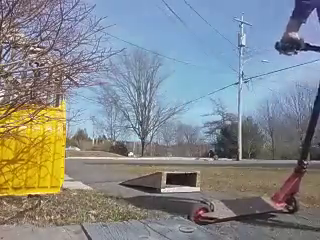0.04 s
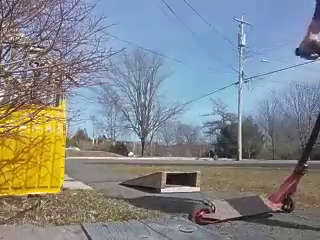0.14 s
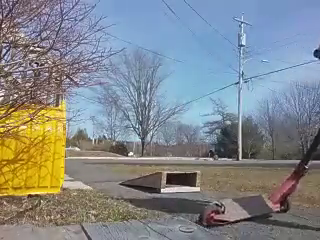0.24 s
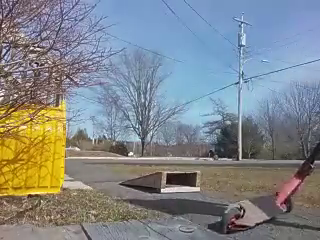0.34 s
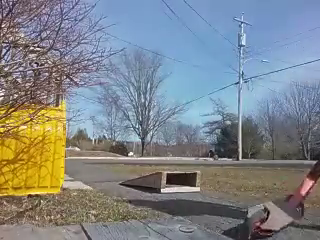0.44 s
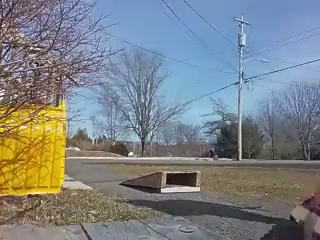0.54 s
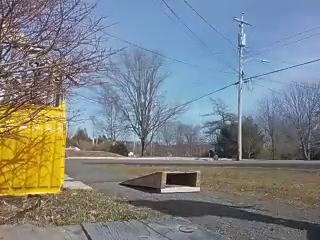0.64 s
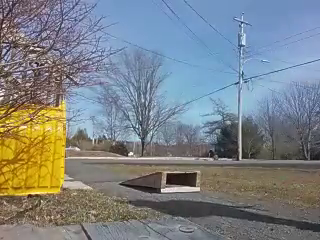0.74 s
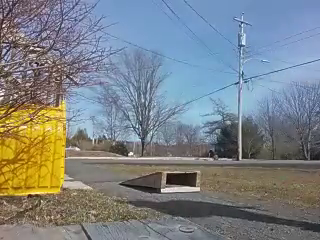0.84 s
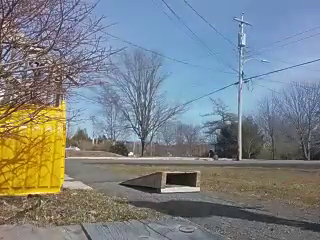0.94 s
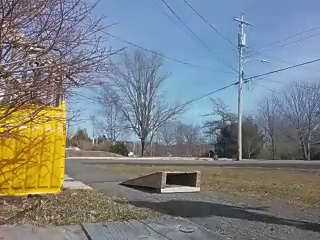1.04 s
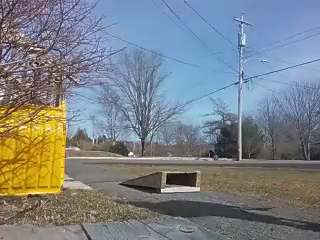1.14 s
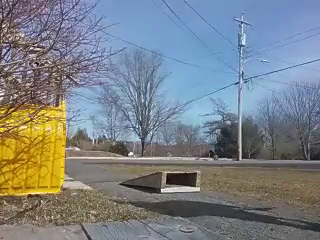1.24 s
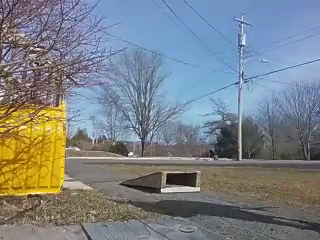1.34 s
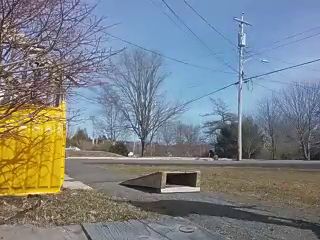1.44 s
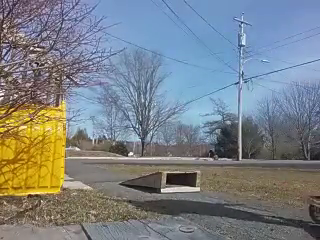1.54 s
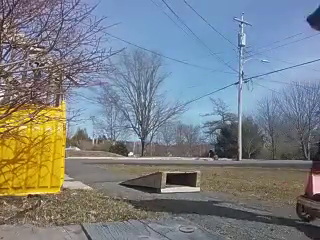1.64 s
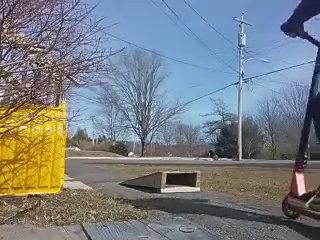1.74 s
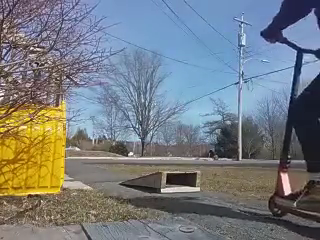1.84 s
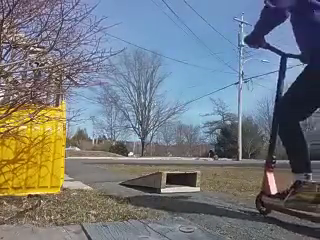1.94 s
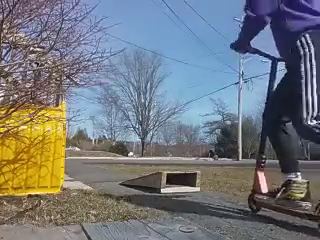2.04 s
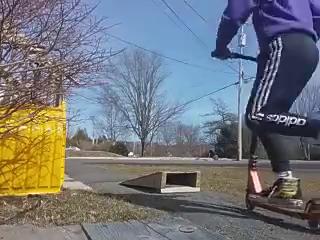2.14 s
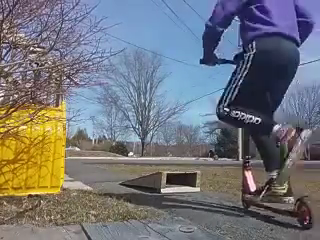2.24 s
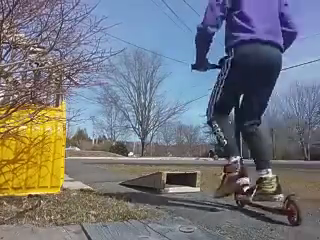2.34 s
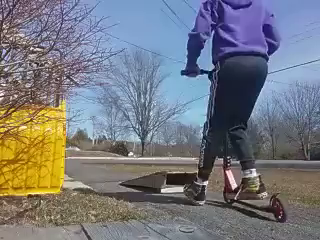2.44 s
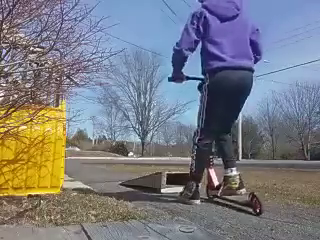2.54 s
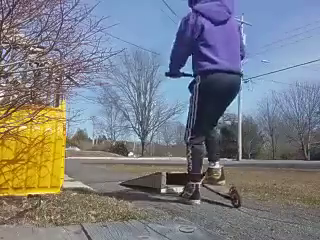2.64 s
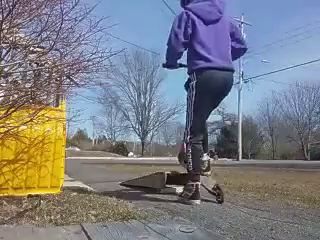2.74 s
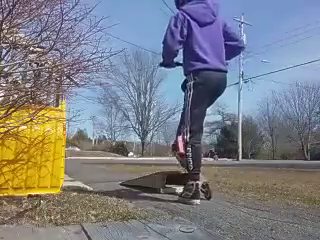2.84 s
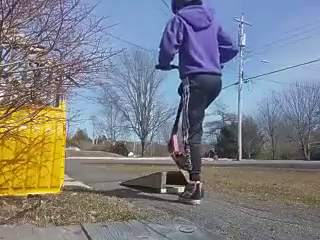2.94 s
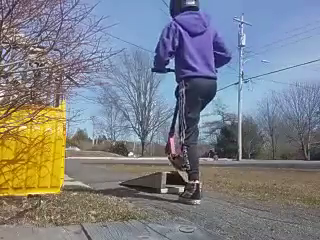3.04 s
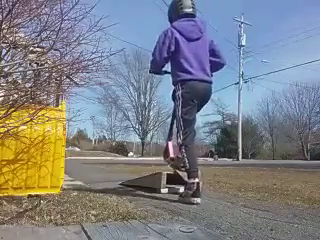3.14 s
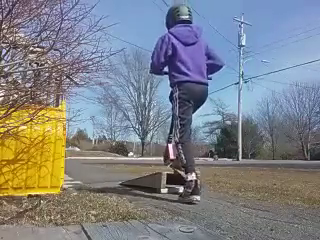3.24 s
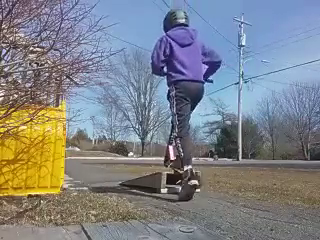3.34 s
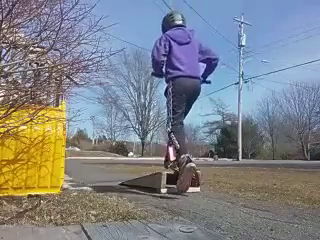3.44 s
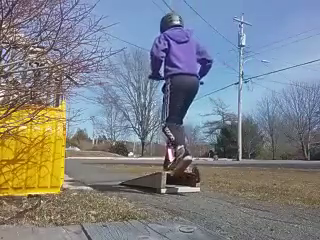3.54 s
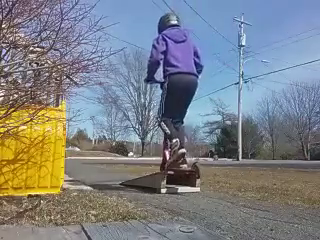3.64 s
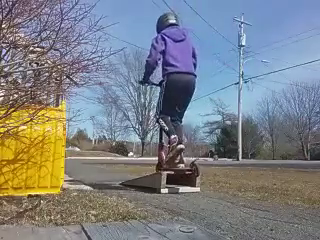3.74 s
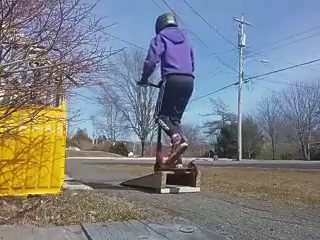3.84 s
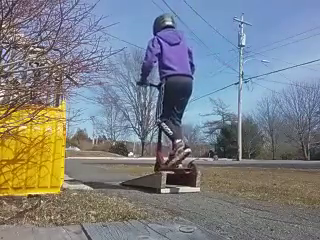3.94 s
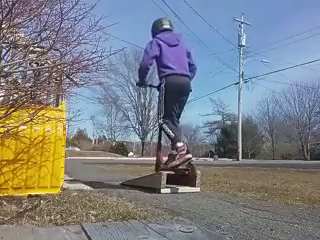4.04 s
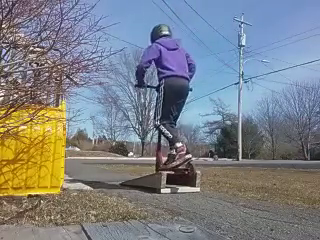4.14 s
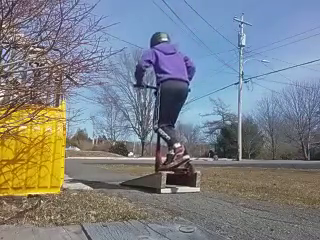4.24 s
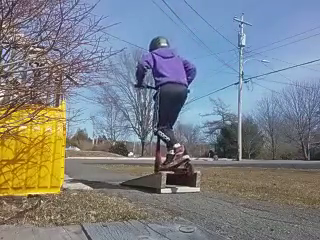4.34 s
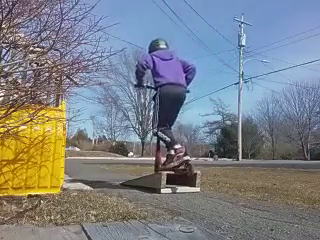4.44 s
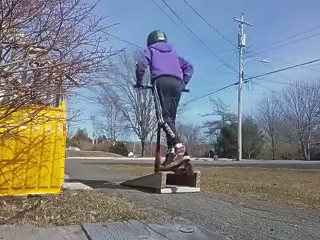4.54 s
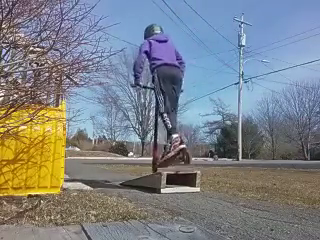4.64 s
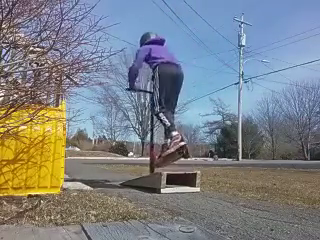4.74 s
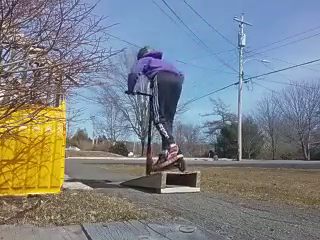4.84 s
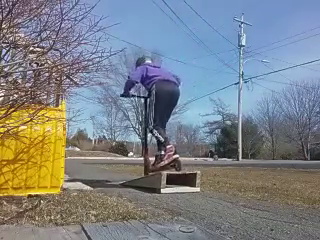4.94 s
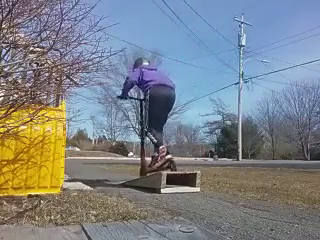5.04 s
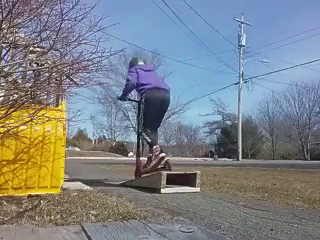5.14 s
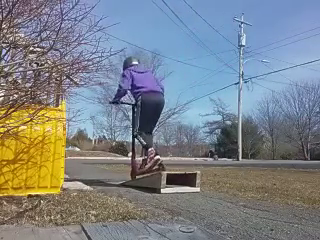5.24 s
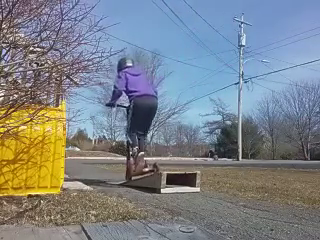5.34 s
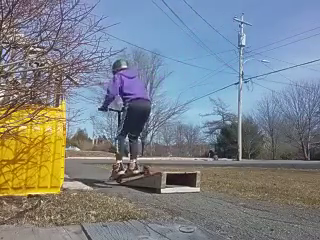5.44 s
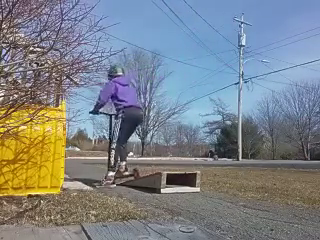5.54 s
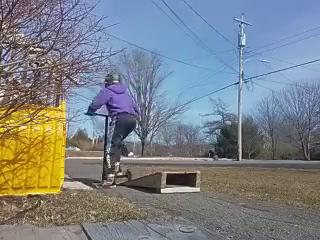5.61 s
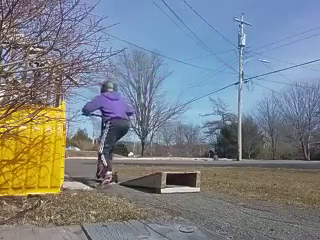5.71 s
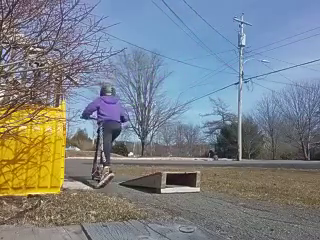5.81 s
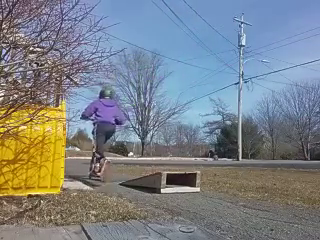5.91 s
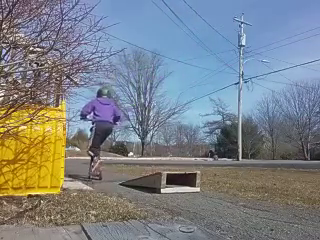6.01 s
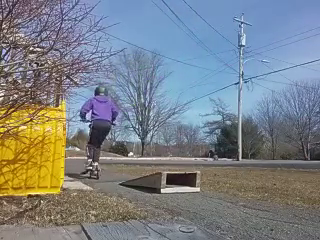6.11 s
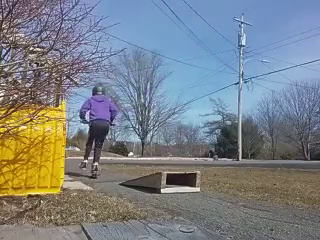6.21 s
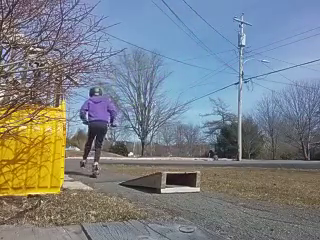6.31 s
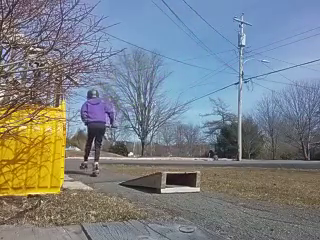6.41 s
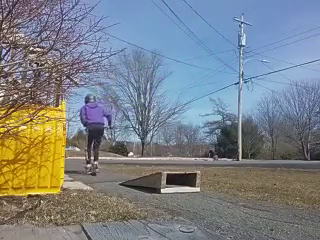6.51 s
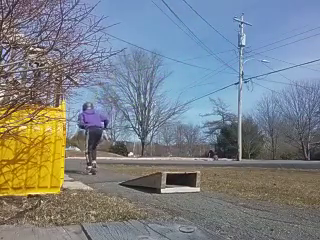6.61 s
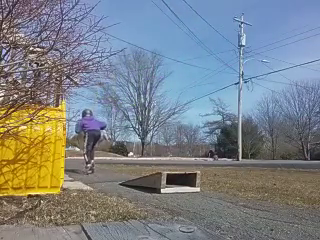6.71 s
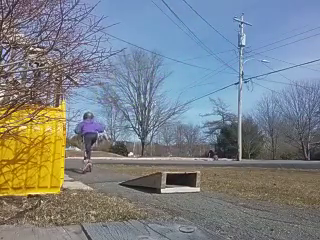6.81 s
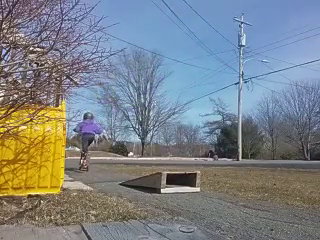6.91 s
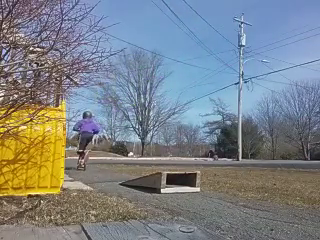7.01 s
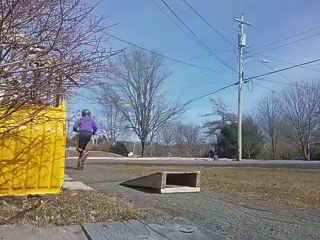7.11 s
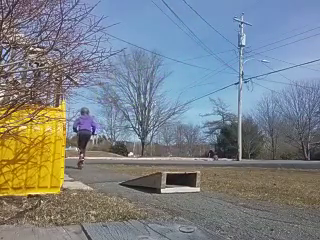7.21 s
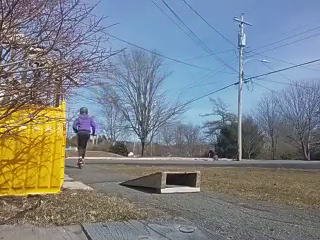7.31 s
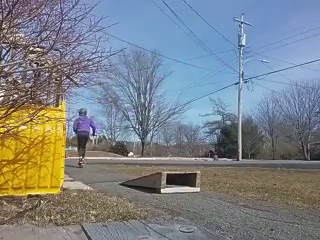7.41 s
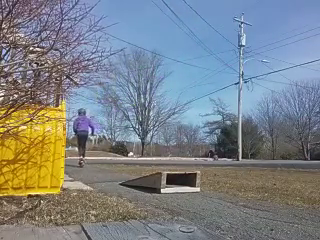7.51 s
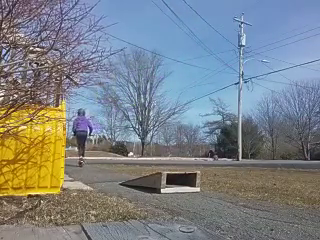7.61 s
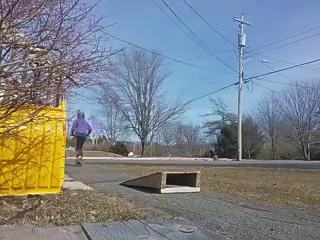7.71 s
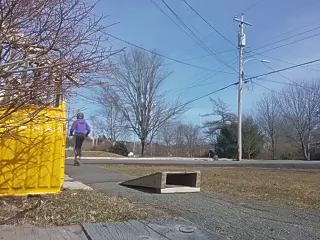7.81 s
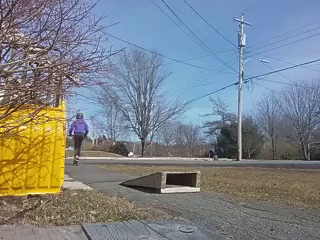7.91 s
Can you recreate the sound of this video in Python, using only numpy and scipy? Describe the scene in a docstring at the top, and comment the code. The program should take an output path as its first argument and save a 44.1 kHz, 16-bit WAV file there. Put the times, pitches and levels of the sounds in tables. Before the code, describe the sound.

Close metallic clatter of a kick scooter comes first, with low wind puffs on a small microphone. Pushes crunch the hard wheels over asphalt, a dull wooden thump marks the ramp, then after a lull a heavy hollow slam and another knock. Quiet rolling and soft distant footfalls recede under thin hiss and open air.

```python
"""Metal kick scooter on a driveway

A scooter is swung round beside the microphone, then pushed away down asphalt; it climbs a small hollow
wooden ramp, hops, lands hard and rolls off. Noisy contacts ring the frame's damped modes as clatter, blows
are voiced by low wooden modes, and coloured grains make the wheels grind over grit when weight bears on them.
Wind bumps the microphone; a thin hiss and a faint buzz lie under the quiet outdoor air."""
import sys
import numpy as np
from scipy import signal
from scipy.fft import rfft, irfft
from scipy.io import wavfile

SR = 44100
rng = np.random.default_rng(int(sys.argv[2]) if len(sys.argv) > 2 else 0)


def file_out(sig):
    """Save sig as 16-bit WAV at sys.argv[1]."""
    # one column per channel
    cols = np.atleast_2d(sig).T
    # limit, then scale
    lim = np.clip(cols, -1, 1)
    pcm = np.round(lim * 32767).astype(np.int16)
    wavfile.write(sys.argv[1], SR, pcm)


N = 351036
TIME = np.arange(N) / SR


def from_db(db):
    """Logarithmic level: decibels to amplitude gain."""
    return 10 ** (np.asarray(db) / 20)


def rms_one(x):
    """Normalisation: scale to an rms of 1."""
    return x / np.sqrt(np.mean(x ** 2) + 1e-20)


def add(out, s, sound):
    """Superposition: mix a sound in at time s."""
    at = max(round(s * SR), 0)
    out[at:at + len(sound)] += sound[:N - at]


def colour(x, spectrum, size=4096):
    """Minimum-phase filtering: a causal response with the given spectrum, found through the cepstrum."""
    hz, db = np.transpose(spectrum)
    bins_hz = np.arange(size // 2 + 1) * SR / size
    level_db = np.interp(np.log(bins_hz + 1), np.log(hz), db)
    cepstrum = irfft(np.log(from_db(level_db)))[:size // 2]
    cepstrum[1:] *= 2
    response = irfft(np.exp(rfft(cepstrum, size)))
    return signal.fftconvolve(x, response)[:len(x)]


def drift(rate_hz):
    """Random modulation: straight lines between normal random knots, `rate_hz` knots a second."""
    knots = rng.standard_normal(4000)
    return np.interp(TIME * rate_hz, np.arange(len(knots)), knots)


def grains(count, spread_db):
    """Granular noise: tiny contacts, most weak and a few strong when the spread is above zero."""
    boost_db = spread_db * np.minimum(rng.exponential(1, count), 5)
    return rms_one(rng.standard_normal(count) * from_db(boost_db))


def ringing(modes, t, vary_db):
    """Modal synthesis: damped sines, each struck with a strength and sign of its own."""
    hz, db, t60 = np.transpose(modes)[:, :, None]
    strength = from_db(db + vary_db * rng.standard_normal(hz.shape)) * rng.choice([-1, 1], hz.shape)
    decay = np.exp(-np.log(1000) * t / t60)
    return np.sum(strength * decay * np.sin(2 * np.pi * hz * t), axis=0)


def swells(rows, attack_s, release_db_per_s):
    """Envelope: each (start, length, dB) event rises, holds and dies away; overlaps add in power."""
    power = np.zeros(N)
    for s, length, db in rows:
        rise = np.clip((TIME - s) / attack_s, 0, 1)
        fall_db = release_db_per_s * np.clip(TIME - s - length, 0, 2)
        power += (rise * from_db(db - fall_db)) ** 2
    return np.sqrt(power)


MOUNT_S = 1.7   # the rider steps on
RIDDEN_BASS_DB = 4   # the rider's weight makes hits heavier
# the empty scooter sounds thinner the harder it is hit
EMPTY_BASS_DB, BASS_PER_DB, USUAL_HIT_DB = -8.5, -1.07, -29.5
RAMP_FROM_S, RAMP_TO_S = 3.7, 5.7
RAMP_BASS_PER_DB, BOARDS_GIVE_DB = 0.96, -35.5   # hits above this table level make the boards thud


def weight_db(s, db):
    """Mass loading: thin bass before the rider mounts, heavier after, heaviest on the hollow ramp."""
    if s < MOUNT_S:
        return EMPTY_BASS_DB + BASS_PER_DB * (db - USUAL_HIT_DB)
    on_ramp = RAMP_FROM_S < s < RAMP_TO_S
    return RIDDEN_BASS_DB + on_ramp * RAMP_BASS_PER_DB * max(db - BOARDS_GIVE_DB, 0)


# hits of the scooter's loose parts and wheels, and late foot strikes:
# start_s, relative level_db, treble_db (against the middle), contact_s
HITS = [(0.36, -35, -8, 0.0031), (0.422, -30, 2, 0.0049), (0.44, -27.5, 9.5, 0.003),
        (0.501, -29, 1.5, 0.0084), (0.528, -22, 0, 0.0038), (0.59, -33.5, -1, .0059),
        (0.666, -35.5, -1.5, 0.0036), (0.684, -32.5, -2.5, 0.0048), (0.727, -17.5, -1.5, 0.0017),
        (0.738, -22, -1.5, 0.0082), (0.797, -15, -1.5, 0.0016), (0.813, -28.5, -3.5, 0.0067),
        (0.875, -19, -6.5, 0.0025), (0.937, -29.5, -2.5, 0.0028), (0.978, -34, -4, 0.0024),
        (1.58, -29.5, -12, 0.0011), (1.684, -33, -2, 0.0055), (1.778, -25.5, -14.5, 0.0017),
        (1.809, -28.5, -9, 0.0031), (1.87, -30.5, -8, 0.0011), (2.016, -49.5, -4, 0.0035),
        (2.633, -24.5, 1.5, 0.0038), (2.66, -32, 4.5, .0074), (2.751, -31.5, -0.5, 0.0021),
        (2.783, -29.5, 5, 0.0019), (3.068, -36, -6, 0.0029), (3.212, -41.5, -5, .011),
        (3.711, -33, 5.5, 0.0057), (4.893, -33.5, -12, 0.0033), (4.902, -22.5, 7.5, 0.0019),
        (4.915, -39.5, 4, 0.016), (4.953, -23, -6, 0.0038), (4.972, -34, 12, .0013),
        (4.992, -38, 6.5, 0.0035), (5.626, -41.5, 6, 0.0014), (5.781, -35, 1.5, 0.0054),
        (5.863, -32.5, -.5, 0.0046), (5.875, -35, -1, 0.0042), (6.67, -56, 9, 0.014),
        (7.513, -49, 5, 0.011)]
# modes of the undamped metal frame: pitch_hz, relative level_db, t60_s
FRAME_MODES = [(1214, -1, .08), (1390, -10, .12), (1664, -7, .12), (1939, -10, .11), (2332, -11, .12),
               (2650, -7, .1), (3635, -7, .16), (4387, -11, .2), (4597, -11, .2), (5610, -16, .17),
               (6186, -12, .2)]
# spectrum of a contact: frequency_hz, relative density_db (per Hz)
CONTACT_SPECTRUM = [(100, -15), (300, -10), (600, -1.5), (1200, -0.5), (1800, -2), (2200, -5.5), (3800, -7),
                    (4700, -8), (5300, -13), (6500, -6.5), (7300, -20), (9000, -28.5), (16000, -32.5)]


def clatter(level_db=-1.5, chatter_db=-7.0, chatter_t60=0.14, ring_db=-7.0, bass_hz=600, treble_hz=2800,
            damping=1.2, uneven_db=4.0, soft_share=1.0):
    """Impact excitation: each hit cracks, chatters briefly and rings with the frame's modes."""
    out, t = np.zeros(N), TIME[:SR // 3]
    places_hz = np.geomspace(400, 9000, 64)
    for s, db, treble_db, touch in HITS:
        age = t / max(touch, .0005)   # in contact times
        onset = 1 - np.exp(-age)
        crack = age * np.exp(1 - age)
        chatter = from_db(chatter_db - 60 * t / chatter_t60) * onset
        contact = colour(grains(len(t), spread_db=3.5) * (crack + chatter), CONTACT_SPECTRUM)
        # each point of contact favours its own short resonances
        uneven = uneven_db * rng.standard_normal(len(places_hz))
        contact = colour(contact, np.c_[places_hz, uneven])
        contact /= np.std(contact[age < np.pi])
        held = damping if s > MOUNT_S else 1   # the rider damps the frame
        modes = [(hz, level, t60 / held) for hz, level, t60 in FRAME_MODES]
        ring = ringing(modes, t, vary_db=0.5) * onset
        # hard contacts are bright, soft ones lose ever more towards the top, loaded ones are heavy
        top_db = treble_db + soft_share * min(treble_db, 0)
        hardness = [(bass_hz / 2, weight_db(s, db)), (bass_hz * 1.8, 0), (treble_hz / 1.6, 0),
                    (treble_hz * 1.3, treble_db), (treble_hz * 3, top_db)]
        add(out, s, from_db(db + level_db) * colour(contact + from_db(ring_db) * ring, hardness))
    return out


def blows(events, modes, vary_db, soft_s=0.0012, dulling=1.44, knee_hz=245):
    """Soft impact: each blow swells quickly and rings a set of modes; gentler blows excite less treble."""
    out, t = np.zeros(N), TIME[:SR // 3]
    hardest_db = max(db for s, db in events)
    for s, db in events:
        # a gentler blow stays in contact longer and misses the upper modes
        gentler_db = dulling * max(db - hardest_db, -10)   # per octave above the knee
        struck = [(hz, level + gentler_db * max(np.log2(hz / knee_hz), 0), t60) for hz, level, t60 in modes]
        ring = ringing(struck, t, vary_db) * (1 - np.exp(-t / soft_s))
        add(out, s, from_db(db) * ring / np.abs(ring).max())
    return out


# blows on the ramp and the ground: start_s, peak level_db (before the echoes)
THUMPS = [(0.594, -37.5), (2.636, -38), (3.214, -40), (3.719, -26), (4.068, -49.5), (4.893, -22),
          (4.905, -18.5), (4.914, -16.5), (4.952, -20.5), (4.961, -12), (4.996, -19), (5.808, -22.5),
          (6.632, -46.5), (6.668, -42.5), (7.514, -44)]
# low wooden modes: pitch_hz, relative level_db (for the hardest blow), t60_s
WOODEN_MODES = [(87, -14, .2), (122, -11, .11), (180, -10, .08), (237, -3, .13), (268, -8, .1),
                (343, -3, .12), (372, -6, .09), (409, -2, .15), (450, -8, .07), (605, -12, .06)]


def thumps():
    """Modal resonance: blows on the ramp and the ground, all voiced by the same low wooden modes."""
    return blows(THUMPS, WOODEN_MODES, vary_db=4.5)


# the deck meets the ramp's edge: start_s, peak level_db (before the echoes)
EDGE_HITS = [(5.659, -17)]
# modes of the hollow knock: pitch_hz, relative level_db, t60_s
EDGE_MODES = [(458, -10.5, 0.029), (640, 0.5, 0.011), (820, -11, 0.0056), (1130, -19, 0.0077)]


def edge_knock():
    """Heavy damping: very short modes make one hollow knock."""
    return blows(EDGE_HITS, EDGE_MODES, vary_db=1.5)


# weight on the wheels (a swing, a push, the run down the ramp):
# start_s, hold_s, relative grit_db, relative scrape_db, relative drone_db
LOADS = [(0.41, 0.2, -45.5, -54.5, -54), (0.71, 0.086, -38.5, -39.5, -45.5), (1.56, 0.23, -51.5, -63, -67),
         (1.745, 0.13, -47.5, -46, -43.5), (2.026, 0.024, -50.5, -63, -66), (2.597, 0.26, -43.5, -51, -54),
         (2.847, 0.15, -44, -64, -71), (3.686, 0.08, -49.5, -52, -42), (4.647, 0.16, -65, -62, -61.5),
         (5.015, 0.375, -79.5, -74, -52.5), (5.463, 0.31, -58.5, -70.5, -40),
         (5.706, 0.18, -46, -49.5, -38.5), (6.612, 0.32, -59.5, -61, -62), (7.463, 0.29, -63, -66.5, -67.5)]


def load():
    """Contact pressure: gains of grit, scrape and drone as weight comes and goes."""
    s, length, *levels = np.transpose(LOADS)
    return [swells(zip(s, length, db), attack_s=0.027, release_db_per_s=136.5) for db in levels]


# free rolling on asphalt and down the ramp:
# start_s, hold_s, whirr level_db (also drives the rolling scrape and drone)
COASTS = [(2.42, 1.1, -60.5), (5.48, 0.34, -56.5), (6.2, 1.57, -65.5)]


def coasting():
    """Rolling envelope: gain of the freely running wheels."""
    return swells(COASTS, attack_s=0.058, release_db_per_s=76.0)


# spectrum of crushed grit: frequency_hz, relative density_db (per Hz)
GRIT_SPECTRUM = [(200, -27.5), (500, -0.5), (750, 8), (1000, 2.5), (1400, -3), (1900, -0.5), (2600, -9),
                 (4000, -22), (8000, -43.5)]
# spectrum of the fine scrape: frequency_hz, relative density_db (per Hz)
SCRAPE_SPECTRUM = [(1200, -13.5), (2500, -5.5), (3700, -10), (4800, -4.5), (5500, -14.5), (6400, 2),
                   (7500, -6.5), (10000, -20.5)]
# spectrum of the low drone: frequency_hz, relative density_db (per Hz)
DRONE_SPECTRUM = [(90, -23), (170, -3), (250, 3.5), (380, -2), (520, -10), (800, -17.5), (2000, -56)]


def wheels(grit, scrape, drone, coast, grit_db=0.0, scrape_db=0.0, drone_db=-6.5,
           coast_scrape_db=-7.5, coast_drone_db=-8.5, bumpy_db=4.0, crushes_per_s=1200):
    """Rolling noise: hard wheels crush grit, and bumps in the ground shake all three sounds together."""
    bumps = from_db(bumpy_db * drift(70))
    crushed = grains(N, spread_db=0.0) * (rng.random(N) < crushes_per_s / SR) * bumps
    crunch = from_db(grit_db) * grit * rms_one(colour(crushed, GRIT_SPECTRUM))
    # loaded and free-running wheels add in power
    scrape_gain = np.hypot(from_db(scrape_db) * scrape, from_db(coast_scrape_db) * coast)
    rasp = scrape_gain * rms_one(colour(grains(N, spread_db=5.0) * bumps, SCRAPE_SPECTRUM))
    drone_gain = np.hypot(from_db(drone_db) * drone, from_db(coast_drone_db) * coast)
    rumble = drone_gain * rms_one(colour(rng.standard_normal(N) * bumps, DRONE_SPECTRUM))
    return crunch + rasp + rumble


def rattle(grit, level_db=-8.5, ticks_per_s=70, damping=1.4, contact_db=-6.0):
    """Random impulse excitation: rough ground keeps the loose parts ticking against the frame."""
    ticks = (rng.random(N) < ticks_per_s / SR) * rng.standard_normal(N)
    modes = [(hz, db, t60 / damping) for hz, db, t60 in FRAME_MODES]
    ring = ringing(modes, TIME[:SR // 8], vary_db=1.0)
    rung = rms_one(signal.fftconvolve(ticks, ring)[:N])
    touched = rms_one(colour(ticks, CONTACT_SPECTRUM))
    return from_db(level_db) * grit * rms_one(rung + from_db(contact_db) * touched)


def whirr(coast, hz=980, width_hz=300, flutter_db=6.5):
    """Resonance: noise through two equal resonators makes the tyres sing, fluttering as they turn."""
    r = np.exp(-np.pi * width_hz / SR)
    poles = [1, -2 * r * np.cos(2 * np.pi * hz / SR), r * r]
    singing = signal.lfilter([1, 0, -1], poles, rng.standard_normal(N))
    singing = signal.lfilter([1, 0, -1], poles, singing)
    return coast * rms_one(singing * from_db(flutter_db * drift(28)))


# scuffs of soles and wheels, and faint whine of a freely spinning wheel:
# middle_s, level_db (rms before the swell), centre_hz, length_s
SCUFFS_AND_WHINE = [(0.275, -42, 1030, 0.038), (1.426, -56.5, 4930, 0.22), (1.615, -50.5, 3390, .11),
                    (1.644, -47, 2190, 0.084), (1.692, -39.5, 4840, 0.1), (4.712, -54.5, 1320, 0.04),
                    (4.804, -49, 1364, 0.093), (5.53, -45, 408, .12), (6.343, -54, 1020, .03),
                    (6.808, -51, 1886, 0.22), (6.869, -61.5, 3480, .16), (7.73, -55.5, 1860, 0.18)]


def scuffs_and_whine(width=1.1, edge_db=-9.0, skirt_db=-35.0):
    """Band-limited noise: each scuff or whine is noise that swells around one pitch."""
    out = np.zeros(N)
    for s, db, hz, length in SCUFFS_AND_WHINE:
        swell = np.hanning(max(int(length * SR), SR // 100))
        band = [(hz / 4, skirt_db), (hz / width, edge_db), (hz, 0), (hz * width, edge_db),
                (hz * 4, skirt_db), (hz * 20, skirt_db * 2)]
        noise = rms_one(colour(grains(len(swell), spread_db=4.0), band))
        add(out, s - length / 2, from_db(db) * swell * noise)
    return out


# small stones snapping: start_s, peak level_db (before the echoes)
STONES = [(1.48, -31), (2.077, -36), (2.365, -45.5), (2.527, -41.5), (5.347, -46.5), (6.001, -35)]


def stones(t60=0.036):
    """Transient: a stone pinched under a wheel gives a thin bright tick of decaying grains."""
    out, t = np.zeros(N), TIME[:SR // 20]
    bright = [(2000, -15), (5000, -15.0), (7000, 1), (9000, -21.0)]   # Hz, dB
    for s, db in STONES:
        tick = colour(grains(len(t), spread_db=6.0) * from_db(-60 * t / t60), bright)
        add(out, s, from_db(db) * tick / np.abs(tick).max())
    return out


# echoes from the house and yard: delay_s, level_db (before dulling)
ECHOES = [(.011, -17), (.019, -17), (.043, -17.5)]


def yard(x, tail_db=-15.5, tail_t60=0.32, dull_hz=5000):
    """Reverberation: a few dull echoes and a short scattered tail join the direct sound."""
    t = TIME[:SR // 2]
    response = rng.standard_normal(len(t)) * from_db(-60 * t / tail_t60) * (t > .008)
    response *= from_db(tail_db) / np.linalg.norm(response)
    for delay, db in ECHOES:
        response[int(delay * SR)] += from_db(db)
    reflected = signal.fftconvolve(x, response)[:N]
    return x + colour(reflected, [(dull_hz, 0), (dull_hz * 2, -9)])


# gusts: start_s, hold_s, relative level_db
GUSTS = [(0.18, 0.16, -37.5), (0.58, 0.35, -45), (1.17, 0.25, -50.5), (2.22, 0.14, -50)]
# spectrum of a gust: frequency_hz, relative density_db (per Hz)
GUST_SPECTRUM = [(20, -32), (40, -8.5), (65, 5.5), (110, 2), (180, -10), (300, -17), (600, -35),
                 (2000, -74)]
# air puffs on the microphone: start_s, peak level_db, rate_hz (the swing starts at twice this and slows)
PUFFS = [(0.208, -33, 110), (0.358, -29.5, 111), (0.676, -31, 137), (1.236, -31, 128.5), (1.32, -22.5, 157),
         (1.439, -34.5, 96.5)]


def wind(level_db=-4.0, lumpy_db=4.5, breeze_db=-55.5, breeze_ends_s=2.97, puff_cycles=4.5, sag=0.57):
    """Turbulence: lumpy low noise, and single puffs whose swing slows as they die."""
    breeze = from_db(breeze_db) * np.clip((breeze_ends_s - TIME) * 2 + 1, 0, 1)
    gust = swells(GUSTS, attack_s=0.036, release_db_per_s=87.5) + breeze
    lumps = from_db(level_db + lumpy_db * drift(25))
    out = lumps * gust * rms_one(colour(rng.standard_normal(N), GUST_SPECTRUM))
    for s, db, hz in PUFFS:
        cycles = hz * TIME[:SR // 10]
        swing = np.sin(2 * np.pi * np.log1p(cycles * sag * 2) / sag)
        puff = cycles * from_db(-60 * cycles / puff_cycles) * swing
        add(out, s, from_db(db) * puff / np.abs(puff).max())
    return out


# course of the thin treble hiss: time_s, relative level_db
HISS_COURSE = [(0.0, -60.5), (0.77, -57), (1.09, -64.5), (1.77, -55), (2.1, -74.5), (2.52, -77),
               (2.73, -62), (3.21, -82.5), (3.86, -68), (4.3, -80), (5.58, -84), (5.85, -80), (6.05, -79),
               (6.83, -69.5), (7.03, -81), (7.96, -80)]
# spectrum of the hiss: frequency_hz, relative density_db (per Hz)
HISS_SPECTRUM = [(1000, -3.5), (3000, 0), (5500, -1), (6800, 11.5), (8000, -1.5), (10000, -4),
                 (13000, -0.5), (15500, 4)]
# spectrum of the outdoor air: frequency_hz, relative density_db (per Hz)
AIR_SPECTRUM = [(25, -9.5), (60, -4.5), (110, 1), (300, -7.5), (550, -9), (800, -9.5), (1300, -20),
                (3000, -23), (8000, -35)]
# partials of the buzz: multiple (of the fundamental), level_db (rms)
BUZZ_PARTIALS = [(2, -68.5), (3, -69.5), (8, -76.5), (10, -72.5), (11, -80)]


def background(air_db=-64.5, hiss_db=8.0, buzz_db=0.0, buzz_hz=42.93):
    """Noise floor and harmonic series: far murmur of air, a thin swelling hiss and a faint steady buzz."""
    s, db = np.transpose(HISS_COURSE)
    hiss = from_db(hiss_db + np.interp(TIME, s, db))
    air = from_db(air_db) * rms_one(colour(rng.standard_normal(N), AIR_SPECTRUM))
    thin = hiss * rms_one(colour(rng.standard_normal(N), HISS_SPECTRUM))
    buzz = np.zeros(N)
    for k, db in BUZZ_PARTIALS:
        cycles = round(k) * buzz_hz * TIME + rng.random()
        buzz += from_db(db + buzz_db) * np.sqrt(2) * np.sin(2 * np.pi * cycles)
    return air + thin + buzz


def scene():
    """Superposition: the scooter sounds in the yard, with wind and background added directly."""
    grit, scrape, drone = load()
    coast = coasting()
    rolling = wheels(grit, scrape, drone, coast) + rattle(grit) + whirr(coast)
    scooter = clatter() + thumps() + edge_knock() + rolling + scuffs_and_whine() + stones()
    return (yard(scooter) + wind() + background())[None]


def record(dry, low_cut_hz=42.0, cutoff_hz=15900):
    """Band limiting: a small microphone loses the deep bass; the top is cut steeply."""
    thin = signal.sosfilt(signal.butter(3, low_cut_hz, "high", fs=SR, output="sos"), dry)
    return signal.sosfilt(signal.ellip(12, .1, 80, cutoff_hz, fs=SR, output="sos"), thin)


dry = scene()
out = record(dry)
file_out(out)
```